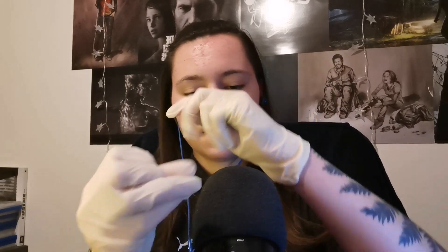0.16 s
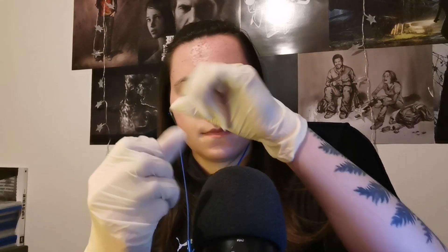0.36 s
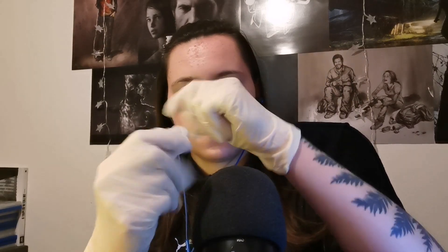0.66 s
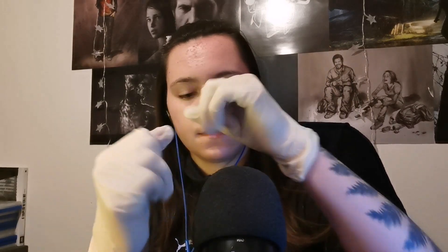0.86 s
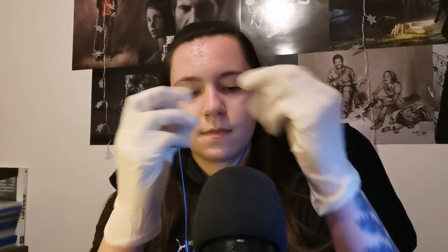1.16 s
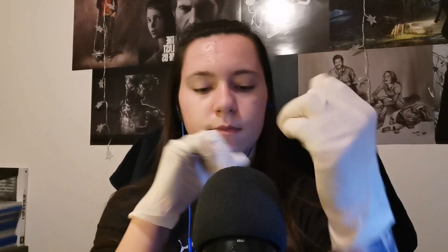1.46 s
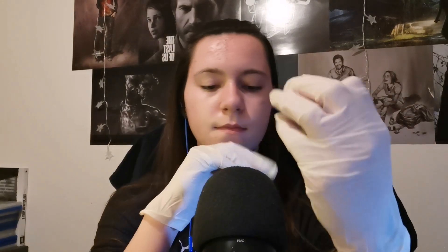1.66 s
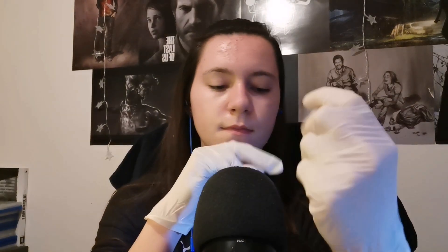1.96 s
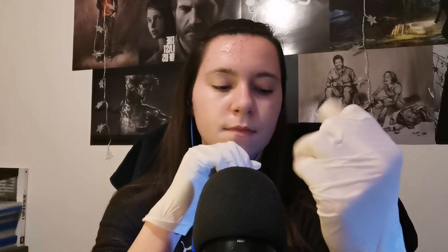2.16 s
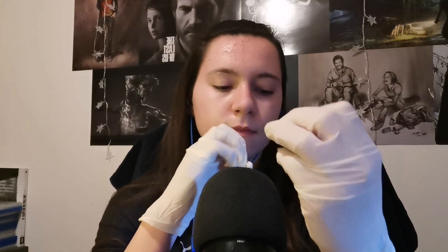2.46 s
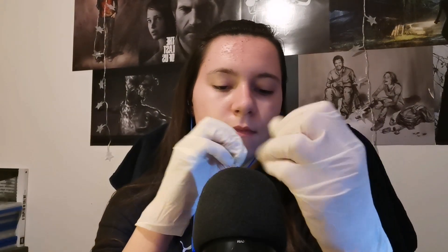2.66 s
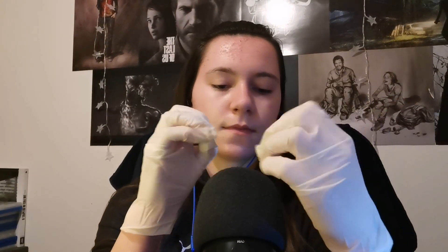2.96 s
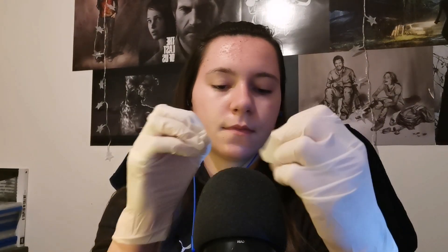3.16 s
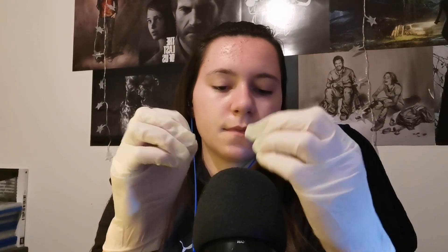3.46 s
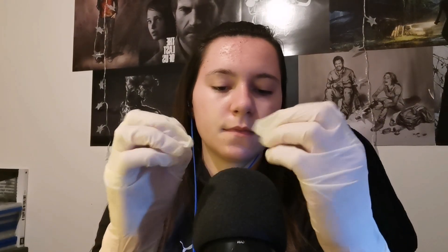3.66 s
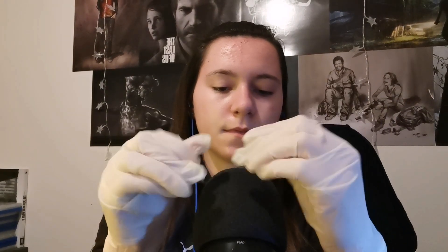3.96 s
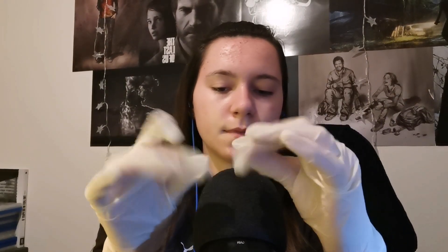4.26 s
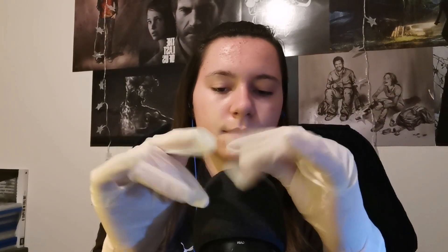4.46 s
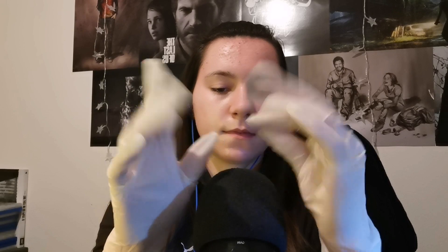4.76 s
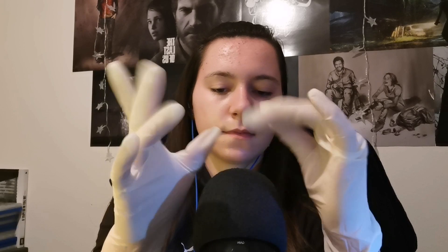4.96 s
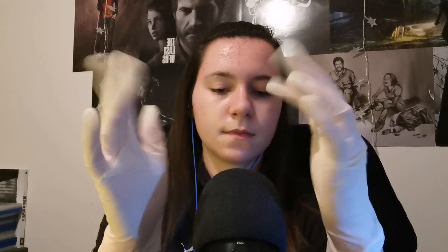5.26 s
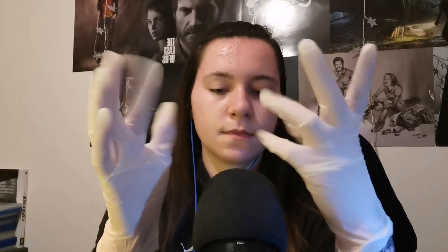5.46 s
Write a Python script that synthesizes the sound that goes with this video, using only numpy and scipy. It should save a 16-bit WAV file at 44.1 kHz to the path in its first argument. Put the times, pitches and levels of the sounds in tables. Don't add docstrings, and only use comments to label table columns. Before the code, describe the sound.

Thin rubber gloves rub, flick and tap very close to a microphone, crackling and snapping over low, lumpy air thumps.

```python
import sys
import numpy as np
from scipy import signal
from scipy.io import wavfile

SR = 44100
rng = np.random.default_rng(int(sys.argv[2]) if len(sys.argv) > 2 else 0)


def materialize(psi):
    bounded = np.clip(np.atleast_2d(psi).T, -1, 1)
    quanta = np.round(bounded * 32767).astype(np.int16)
    wavfile.write(sys.argv[1], SR, quanta)


def magnitude_from_level(level_db):
    exponent = np.asarray(level_db, float) / 20
    return 10 ** exponent


N = 247386


def in_time(rows):
    s, *columns = np.transpose(rows)
    return [np.interp(np.arange(N) / SR, s, c) for c in columns]


def rms_one(x):
    return x / np.sqrt(np.mean(x ** 2) + 1e-20)


def drift(rate):
    pole = np.exp(-80 * np.pi * rate / SR)
    noise = rng.standard_normal(N // 40 + 2002)
    slow = signal.lfilter([1], [1, -2 * pole, pole * pole], noise)[2000:]
    return np.interp(np.arange(N) / 40, np.arange(len(slow)), rms_one(slow))


def band(x, low_hz, high_hz):
    return signal.sosfilt(signal.butter(2, [low_hz, high_hz], "band", fs=SR, output="sos"), x)


def below(x, cut_hz):
    return signal.sosfilt(signal.butter(2, min(cut_hz, .45 * SR), fs=SR, output="sos"), x)


def grains(per_s, spread_db, smooth):
    born = rng.random((4, N)) < per_s * magnitude_from_level(6 * drift(25)) / SR
    sizes = magnitude_from_level(spread_db * np.minimum(rng.exponential(1, (4, N)), 3.2))
    sizes = sizes * rng.choice([-1, 1], (4, N))
    return rms_one(born * sizes) + smooth * rng.standard_normal((4, N))


def coloured(streams, spectrum, patchy_db, patch_rate, slope_db=0):
    hz, level_db = np.transpose(spectrum)
    edges = hz[0] * 2 ** np.arange(0, np.log2(hz[-1] / hz[0]) + .01, 1 / 3)
    parts = []
    for k, (low, high) in enumerate(zip(edges, edges[1:])):
        centre = np.sqrt(low * high)
        gain_db = np.interp(np.log(centre), np.log(hz), level_db) + patchy_db * drift(patch_rate)
        octaves = min(np.log2(centre / 3000), 1)
        parts.append((magnitude_from_level(gain_db) * band(streams[k % 2::2], low, high), octaves))
    scale = np.sqrt(np.mean(sum(part for part, _ in parts) ** 2))
    return sum(part * magnitude_from_level(slope_db * octaves) for part, octaves in parts) / scale


def placed(pair):
    # start_s, side_over_front_db, lean_left (-1..1)
    hands = [(0.1, 1, 0.17), (0.5, 0, -0.048), (0.9, 1, -0.13), (1.3, -1, -0.26), (1.7, -2.5, 0.011),
             (2.1, -1, 0.24), (2.5, -2.5, -0.12), (2.9, 1, -0.19), (3.3, 0.5, -0.33), (3.7, 1.5, 0.29),
             (4.1, 3, 0.25), (4.5, 1, 0.49), (4.9, 1, 0.46), (5.3, -0.5, 0.67)]
    side_db, lean = in_time(hands)
    lean = np.clip(lean, -.95, .95)
    side = lean * pair[0] + np.sqrt(1 - lean ** 2) * pair[1]
    return np.array([pair[0], magnitude_from_level(side_db) * side])


def add(out, x, s):
    start = round(s * SR)
    x = x[:, max(-start, 0):N - start]
    out[:, max(start, 0):max(start, 0) + x.shape[1]] += x


def popped(rows, decay_s, rise_s, gain_db):
    out, t = np.zeros((2, N)), np.arange(round(.06 * SR)) / SR
    envelope = np.minimum(t / rise_s, 1) * np.exp(-t / decay_s)
    bursts = rng.standard_normal((len(rows), len(t)))
    for (s, peak_db, low_hz, high_hz, pan_db), burst in zip(rows, bursts):
        x = below(band(burst * envelope, low_hz, high_hz), 1.34 * high_hz + 500)
        side = np.tanh(pan_db * np.log(10) / 40)
        add(out, magnitude_from_level(peak_db + gain_db) * x / abs(x).max() * [[1], [side]], s)
    return out


def room_noise():
    return magnitude_from_level(-64.5) * rms_one(band(rng.standard_normal((2, N)), 60, 5100))


def fingers():
    # start_s, friction_db, air_flutter_db
    contact = [(0, -44, -41), (.3, -46, -46.5), (.62, -43, -42.5), (.8, -41.5, -39.5), (1.16, -51, -43.5),
               (1.3, -61, -52.5), (1.35, -44.5, -48), (1.9, -44.5, -49.5), (2.35, -46, -46.5),
               (2.5, -45, -41.5), (2.81, -54.5, -46), (3.32, -77, -51), (3.45, -60, -40), (3.74, -82, -50),
               (3.92, -65, -48.5), (3.975, -51, -39.5), (5.05, -44.5, -31.5), (5.3, -76, -78)]
    # start_s, hold_s, friction_db, air_flutter_db
    rubs = [(0, 0.073, -44, -61), (.13, 0.12, -44.5, -43), (.32, 0.1, -39, -43.5), (.81, 0.27, -39.5, -38),
            (1.09, 0.016, -39.5, -38.5), (1.215, 0.04, -44.5, -54), (1.43, 0.25, -42.5, -41.5),
            (1.826, 0.02, -38, -44), (1.99, 0.047, -46, -41.5), (2.13, 0.064, -38.5, -41.5),
            (2.39, 0.029, -41.5, -67), (2.565, 0.031, -36, -46)]
    flicks = [(2.748, 0.017, -42.5, -35.5), (2.87, 0.024, -47.5, -38), (2.938, 0.0058, -48.5, -40),
              (3.026, 0.0069, -53, -32.5), (3.057, 0.016, -41.5, -31.5), (3.18, 0.11, -51.5, -45),
              (3.361, 0.045, -44, -44), (3.476, 0.0034, -43, -33.5), (3.512, 0.043, -46.5, -35),
              (3.618, 0.034, -45.5, -35), (3.803, 0.018, -40.5, -38.5)]
    brushes = [
        (4.085, 0.04, -41, -31.5),
        (4.135, 0.039, -41.5, -30.5),
        (4.216, 0.017, -42.5, -33),
        (4.265, 0.016, -39, -30),
    ]
    taps = [(4.392, 0.024, -44.5, -32.5), (4.478, 0.03, -38.5, -35), (4.63, 0.052, -36, -26.5),
            (4.73, 0.037, -36, -24), (4.888, 0.12, -37.5, -36), (5.092, 0.0035, -37, -45),
            (5.128, 0.0071, -34.5, -32), (5.196, 0.051, -36.5, -33), (5.37, 0.041, -36, -31),
            (5.465, 0.068, -47, -44.5), (5.562, 0.027, -40, -40), (5.585, 0.0098, -43, -36)]
    # strokes, attack_db_per_s, release_db_per_s, bright_db_per_octave
    gestures = [(rubs, 550, 234, 1), (flicks, 790, 430, 2.6),
                (brushes, 600, 490, 3.1), (taps, 760, 340, 0.76)]
    rest_bright_db_per_octave, air_slack = 3, 0.84
    t, (rest_db, calm_db) = np.arange(N) / SR, in_time(contact)
    friction, air = magnitude_from_level(2 * rest_db), magnitude_from_level(2 * calm_db)
    bright = rest_bright_db_per_octave * friction
    for strokes, attack, release, bright_db in gestures:
        for s, hold, friction_db, air_db in strokes:
            before_db = attack * np.maximum(s - t, 0)
            after_db = release * np.maximum(t - s - hold, 0)
            under = magnitude_from_level(-2 * (before_db + after_db))
            stroke = magnitude_from_level(2 * friction_db) * under
            friction = friction + stroke
            bright = bright + bright_db * stroke
            air = air + magnitude_from_level(2 * air_db) * under ** air_slack
    return 10 * np.log10(friction), bright / friction, 10 * np.log10(air)


def stirred_air(flutter_db):
    # start_s, level_db
    swell_levels = [(0, -22), (.22, -32.5), (.69, -35), (.93, -40), (1.1, -30.5), (1.55, -36),
                    (1.91, -34.5), (2.2, -33.5), (2.35, -37.5), (2.8, -30.5), (2.95, -30.5), (3.27, -30.5),
                    (3.63, -26), (3.73, -32.5), (4.16, -26), (4.47, -21.5), (5.61, -27.5)]
    # pitch_hz, level_db (per Hz)
    flutter_spectrum = [(100, 5), (140, -1), (250, -8), (400, -14.5), (1200, -37)]
    swell_db, = in_time(swell_levels)
    swell = rms_one(band(band(rng.standard_normal((2, N)), 26.3, 47.2), 17.4, 52.3))
    swell = swell * magnitude_from_level(2.4 * drift(6.1))
    swing = magnitude_from_level(-5) * rms_one(band(rng.standard_normal((2, N)), 58.3, 91.8))
    gusts = grains(150, spread_db=4, smooth=.6)
    flutter = coloured(gusts, flutter_spectrum, patchy_db=1.5, patch_rate=14)
    flutter = magnitude_from_level(flutter_db - 1 + 2.24 * drift(32)) * flutter
    return placed(magnitude_from_level(swell_db - 2.5) * (swell + swing) + flutter)


def puffs():
    # peak_s, peak_db, length_ms, direction_rad
    rub_puffs = [(.04, -20, 38, -1.1), (.132, -12, 28, 0.36), (.194, -29, 70, -0.9), (.256, -21, 16, 0.6),
                 (.383, -21, 15, 1), (.533, -25.5, 5, 1), (.689, -26, 44, -0.8), (.741, -24.5, 9.3, 0.2),
                 (.807, -20, 47, 0.3), (.852, -22.5, 46, 1), (1.003, -20.5, 52, -0.07),
                 (1.105, -18, 23, -0.3), (1.235, -25.5, 40, 0.2), (1.37, -22.5, 45, 0.4),
                 (1.452, -24.5, 47, 1.3), (1.742, -24, 33, 0.9), (1.815, -30.5, 97, -0.67),
                 (2.062, -27, 57, 1), (2.103, -20, 17.8, -0.8), (2.193, -26, 30, -0.6),
                 (2.413, -26.5, 29, -0.9), (2.481, -30, 46, -0.9), (2.587, -24.5, 36, 0.2),
                 (2.653, -22, 9.8, -1)]
    flick_puffs = [(2.777, -27.5, 39, 1.5), (2.892, -26, 43, -3.5), (2.944, -27.5, 42, 0.5),
                   (3.069, -14.5, 12.6, -0.6), (3.179, -24, 7.7, -1.9), (3.288, -17, 22, 1.5),
                   (3.369, -19.5, 15, 0.7), (3.406, -8.5, 40.7, 2), (3.493, -12.5, 30, 4),
                   (3.635, -6, 22.8, 0.7), (3.824, -17.5, 12, 3.5)]
    tap_puffs = [(3.979, -18, 43, 0), (4.192, -14.5, 21, 0.34), (4.288, -14, 11, -0.3),
                 (4.406, -27, 13.5, 4), (4.482, 1, 13.6, 3), (4.573, -30, 11.6, 4), (4.661, -15, 15, 0.4),
                 (4.737, -15.5, 21.6, 3), (4.799, -25, 59, -0.5), (4.934, -7.5, 17.7, 1),
                 (4.988, -14, 81, 1), (5.051, -14, 14.4, -0.9), (5.097, -12, 7, 5.5), (5.153, -15, 27.4, 3),
                 (5.223, -11.5, 15, 3.1), (5.393, -14, 36.5, -0.9), (5.48, -48, 42, 2),
                 (5.542, -27, 20, -1.7)]
    capsule_hz, quick_puff_hz_ms, spread_hz = 67, 135, 1.3
    blown = rub_puffs + flick_puffs + tap_puffs
    out, phases = np.zeros((2, N)), rng.uniform(0, 2 * np.pi, (len(blown), 3))
    for (s, peak_db, ms, angle), (phase, other, chance) in zip(blown, phases):
        hz = capsule_hz + quick_puff_hz_ms / ms + spread_hz * np.sin(chance)
        rise_s = ms * 0.000374
        t = np.arange(round(7 * rise_s * SR)) / SR
        swell = (t / rise_s * np.exp(1 - t / rise_s)) ** 0.79
        main = np.sin(2 * np.pi * hz * t + phase)
        across = 0.19 * np.sin(2 * np.pi * 1.196 * hz * t + other)
        front = np.cos(angle) * main - np.sin(angle) * across
        side = np.sin(angle) * main + np.cos(angle) * across
        add(out, magnitude_from_level(peak_db + 1) * swell * np.array([front, side]), s - rise_s)
    return out


def shoves():
    # start_s, peak_db, left_over_right_db
    shove_rows = [
        (4.485, -8, 3),
        (5.215, -15.5, -5),
    ]
    rows = [(s, db, 35, 65, pan) for s, db, pan in shove_rows]
    return popped(rows, decay_s=0.01, rise_s=0.006, gain_db=1.5)


def thuds():
    # start_s, peak_db, ring_hz, left_over_right_db
    thud_rows = [(2.88, -23.5, 142, -7), (2.936, -25, 115, -4), (3.056, -24, 107, -8),
                 (3.173, -30.5, 110, -1.0), (3.279, -33, 110, 13), (3.359, -22, 109.7, -13),
                 (3.472, -14.5, 112, 11), (3.622, -15, 110, 5), (3.799, -15, 114, -12),
                 (3.944, -24, 110, -3), (4.087, -23, 109, 9.0), (4.088, -15, 175.7, 19),
                 (4.133, -19.5, 130, 3), (4.213, -18.5, 107, 9), (4.273, -23, 111, 0),
                 (4.397, -16.5, 132, 16), (4.477, -14, 114, 2), (4.575, -22.5, 144, -3),
                 (4.633, -12.5, 110, 17), (4.727, -35.5, 110, 5.5), (4.73, -16.5, 137, -8),
                 (4.811, -16.5, 162, 7.5), (4.887, -13.5, 109, 14), (5.02, -17, 113, 9),
                 (5.204, -19.5, 155, 3), (5.384, -21.5, 116, -17)]
    rows = [(s, db, hz / 1.28, hz * 1.27, pan) for s, db, hz, pan in thud_rows]
    return popped(rows, decay_s=0.019, rise_s=0.0022, gain_db=-3.5)


def knocks():
    # start_s, peak_db
    landings = [(1.827, -30), (3.026, -49), (3.178, -37.5), (3.361, -43), (4.661, -26.5), (4.961, -29.5),
                (5.235, -33), (2.566, -27.5), (2.89, -33), (3.057, -26.5), (3.082, -30.5), (3.511, -30.5),
                (4.394, -29), (4.736, -42), (4.893, -21.5), (5.095, -26), (5.129, -22), (5.374, -28),
                (5.563, -22.5), (5.577, -24)]
    out, t = np.zeros((2, N)), np.arange(round(.04 * SR)) / SR
    bursts = rng.standard_normal((len(landings), 2, len(t)))
    for (s, peak_db), burst in zip(landings, bursts):
        burst[:, 0] = 4.4
        x = band(burst * np.exp(-t / 0.0029), 293, 840)
        add(out, magnitude_from_level(peak_db) * x / abs(x[0]).max() * [[1], [.6]], s)
    return out


def scuffs():
    # start_s, peak_db, ring_hz, left_over_right_db
    scuff_rows = [(0.12, -26, 5400, -7), (0.169, -27.5, 5540, -2.5), (1.094, -37, 3580, 0),
                  (1.138, -32, 13800, 10), (1.821, -35, 7300, 1), (1.830, -13.5, 3030, 4),
                  (2.571, -23.5, 2670, 2), (5.127, -20, 3270, 14), (5.128, -23, 7200, 16),
                  (5.216, -21.5, 2230, 6), (5.538, -28.5, 3520, 21), (5.589, -27.5, 6640, -13)]
    rows = [(s, db, hz / 1.175, min(hz * 1.093, 15500), pan) for s, db, hz, pan in scuff_rows]
    return popped(rows, decay_s=0.0028, rise_s=0.0019, gain_db=-3.5)


def cracks():
    # start_s, peak_db, left_over_right_db
    crack_rows = [(0.1186, -29, 0), (0.7642, -32, -1.0), (1.138, -40, 8), (1.1847, -49, -8.5),
                  (1.8228, -40, 0.5), (1.829, -24, 1.0), (2.6369, -33, -4), (2.7477, -29, 7),
                  (2.8734, -37, 0.0), (2.8883, -35, -1), (2.937, -26.5, -7), (3.058, -27, 5.0),
                  (3.0804, -38, 5.0), (3.3596, -35, 4.5), (3.5114, -36, 0.0), (3.617, -30, 15),
                  (3.8048, -34, -2.5), (3.8172, -27, 1.5), (4.6339, -44, 5.0), (4.9789, -39, 5.5),
                  (5.1272, -40, 8.0), (5.3717, -32, -3)]
    rows = [(s, db, 8300, 15000, pan) for s, db, pan in crack_rows]
    return popped(rows, decay_s=0.0029, rise_s=0.00056, gain_db=-10)


def ticks():
    # start_s, peak_db, ring_hz, left_over_right_db
    crease_ticks = [(0.0262, -26, 5600, 2), (0.3207, -39, 4180, 12), (0.3373, -25, 2150, -4),
                    (0.3994, -29, 2050, 2), (0.427, -37, 2010, 3), (0.4605, -28.5, 2170, 2),
                    (0.5514, -29, 2020, -6), (0.6714, -29, 2170, -15.5), (0.9086, -24, 1880, 4),
                    (0.935, -23, 2000, 1), (0.95, -25, 2040, -0.5), (0.9634, -26, 2150, -2.0),
                    (1.0196, -23.5, 1750, 0.5), (1.0768, -40, 2260, -8), (0.014, -34, 5500, 0),
                    (1.1393, -15, 1830, 5), (1.25, -39, 2350, 8), (1.413, -28, 3270, 54),
                    (1.4701, -23.5, 2120, 1), (1.5247, -24, 1990, 21), (1.555, -25.5, 2910, 8),
                    (1.6302, -25, 2020, 0), (1.7254, -29, 2380, 11), (1.7744, -28, 2500, 2.5),
                    (2.136, -25, 3620, 15), (2.169, -26, 2480, 8), (2.1856, -18, 2630, 6),
                    (2.4715, -31, 1870, -1.0), (2.549, -28, 1900, 12),
                    (2.7477, -31, 5600, 1.0), (2.7734, -29, 5390, -3.5), (2.8419, -41, 5200, -5.0),
                 (2.9746, -38, 1580, -5.0), (3.0674, -30, 1750, 4.0), (3.1762, -41, 1590, -7.0),
                 (3.26, -37, 1840, 2.0), (3.276, -39, 1470, -6.0), (3.3194, -43, 1730, -4.5),
                 (3.3954, -37, 2100, -0.5), (4.0701, -36, 2100, -0.5), (4.1021, -30, 1550, 1.0),
                 (4.1744, -28, 3150, 4.5), (4.2183, -33, 5270, 3.5), (4.4824, -31, 1320, 4.5),
                 (4.6594, -28, 2090, 1.0), (4.7504, -30, 2180, 5.0), (4.7714, -32, 3290, 1.5),
                 (4.8344, -36, 1540, 3.0), (4.9596, -27, 2090, 7.0), (4.9754, -24, 3210, 9.0),
                 (5.0115, -27, 2170, 7.0), (5.0544, -31, 2110, 6.0), (5.0928, -25, 3280, 11.5),
                 (5.2314, -26, 3470, 8.0), (5.2654, -26, 3350, 8.5), (5.3742, -18, 2070, -2.0),
                 (5.4314, -29, 5970, 4.5), (5.4819, -27, 2690, 14.0), (5.5914, -28, 5490, -1.0)]
    width = 1.17
    rows = [(s, db, hz / width, hz * width, pan) for s, db, hz, pan in crease_ticks]
    return popped(rows, decay_s=0.0012, rise_s=0.000088, gain_db=-5.5)


def snaps(flutter_db):
    # start_s, peak_db, ring_hz, length_ms, direction_rad
    rub_snaps = [(.0555, -20, 2290, 0.39, -0.26), (.1052, -14, 1700, 0.28, -0.81),
                 (.12, -16.5, 2210, 1, -0.31), (.175, -22.5, 1800, 0.79, -0.86),
                 (.628, -20, 2900, 1.7, -1.43), (.647, -22, 3230, .9, -1.4),
                 (.735, -13.5, 3920, 1.3, -1.14), (.765, -16, 4660, 1.4, -1.48),
                 (1.0925, -17, 4800, 1.7, -1.03), (1.1097, -20.5, 2360, 0.82, -0.19),
                 (1.139, -19.5, 3800, 3.1, 0.18), (1.1857, -16.5, 6850, 0.59, -1.08),
                 (1.22, -24, 1970, 0.34, -1.27), (1.445, -21.5, 2710, 1.2, 0.73),
                 (1.659, -23, 4070, 1, 0.82), (1.829, -11, 3050, 1, 0.68), (2.208, -20.5, 2650, 0.8, -0.29),
                 (2.418, -21, 4850, 0.91, 0.9), (2.566, -19, 1280, 0.91, -0.56),
                 (2.637, -33, 2200, 2, -0.033), (2.645, -20, 3000, 3.2, 0.94)]
    flick_snaps = [(2.782, -21.5, 5040, 0.82, -0.74), (2.824, -28, 5074, .8, -0.89),
                   (2.888, -18, 4600, 3.1, 0.75), (2.938, -25.5, 4560, 0.49, 0.43),
                   (3.026, -27.5, 1583, 1.8, -0.77), (3.057, -17, 5900, 2.3, 0.52),
                   (3.081, -30.5, 1810, 5.5, 0.98), (3.208, -33, 1660, 2.1, -0.71),
                   (3.217, -31.5, 4670, 0.63, -0.94), (3.361, -13.5, 3300, 1.8, 0.9),
                   (3.342, -45, 5000, 0.36, 0), (3.513, -22, 5100, 1.6, -1.17),
                   (3.545, -39, 3500, .6, 0.0094), (3.619, -20, 5100, 1.2, 0.88),
                   (3.643, -36, 3040, 2.6, 0.065), (3.806, -27, 5700, 1, -0.22),
                   (3.818, -19.5, 4850, 4.4, -1.2)]
    tap_snaps = [(4.149, -35, 2027, 1.56, -2), (4.267, -26.5, 3090, 1.4, 4), (4.396, -18.5, 4860, 5.2, 5),
                 (4.636, -18, 3400, 1.7, 0.4), (4.692, -25.5, 2520, 2.7, 3), (4.736, -23, 1350, 1.2, -0.06),
                 (4.891, -18.5, 3100, 4, 0), (5.094, -37, 3184, 2.5, 2.5), (5.132, -19, 3120, 1.3, -0.5),
                 (5.141, -18, 3050, 2.8, 3), (5.196, -17, 2920, 1.8, 0), (5.374, -14, 2550, 2.4, 1.5),
                 (5.465, -24.5, 3140, 1.2, 0.1), (5.5636, -17, 2600, 0.6, 0.4),
                 (5.575, -20, 2650, 0.22, -1.5)]
    folds = rub_snaps + flick_snaps + tap_snaps
    out, t = np.zeros((2, N)), np.arange(round(.05 * SR)) / SR
    bursts = rng.standard_normal((len(folds), 2, len(t)))
    for (s, peak_db, ring_hz, ms, angle), burst in zip(folds, bursts):
        knock_db = -5 + 0.83 * (flutter_db[round(s * SR)] - peak_db)
        decay_s = max(ms, .3) * 0.002
        burst = burst * np.minimum(t / 0.0001, 1) * np.exp(-t / decay_s)
        burst[:, 8] += 3 * abs(burst).max()
        ringing = band(burst, ring_hz / 1.24, ring_hz * 1.207)
        wide = band(burst, 1240, 5660)
        top = band(burst, 8300, 10000)
        knock = band(burst, 274, 790)
        body = ringing / abs(ringing).max() + wide / abs(wide).max()
        body = below(body, min(2.7 * ring_hz, 8000))
        top_gain = magnitude_from_level(-34) * (ring_hz / 4500) ** 0.94 * ms ** 0.67
        x = body / abs(body).max() + top_gain * top / abs(top).max()
        x = x + magnitude_from_level(knock_db) * knock / abs(knock).max()
        turn = np.array([[np.cos(angle), -.3 * np.sin(angle)],
                         [np.sin(angle), 0.78 * np.cos(angle)]])
        add(out, magnitude_from_level(peak_db + 1) * turn @ x, s)
    return out


def cupped(slips, centre_hz, width_hz):
    turns = np.exp(2j * np.pi * np.cumsum(centre_hz * magnitude_from_level(0.3 * drift(11))) / SR)
    slow = signal.sosfilt(signal.butter(2, width_hz, fs=SR, output="sos"), slips)
    return rms_one(np.real((slow[:2] + 1j * slow[2:]) * turns))


def crackle(per_s, spread_db, cycles):
    born = rng.random((2, N)) < per_s * magnitude_from_level(5 * drift(30)) / SR
    sizes = magnitude_from_level(spread_db * np.minimum(rng.exponential(1, (2, N)), 3))
    sizes = sizes * rng.choice([-1, 1], (2, N))
    dealt, out = rng.integers(0, 10, N), 0
    for k, hz in enumerate(np.geomspace(1300, 7000, 10)):
        r, w = magnitude_from_level(-60 * hz / (cycles * SR)), 2 * np.pi * hz / SR
        clicks = born * sizes * (dealt == k) + 1e-18
        out = out + signal.lfilter([np.sin(w)], [1, -2 * r * np.cos(w), r * r], clicks)
    return rms_one(out)


def rubbing(friction_db, slope_db):
    # pitch_hz, level_db (per Hz)
    film_spectrum = [(500, -12.5), (800, 0), (1150, -13), (1800, -6), (2600, -8), (3100, -7), (4200, -10.5),
                     (7400, -15), (8300, -27.5), (10000, -27), (14500, -31.5), (16100, -28)]
    # start_s, pitch_hz
    hollow_pitch = [(0, 2039), (.82, 1897), (1.1, 2218), (1.75, 2470), (2.18, 2690), (2.35, 1906),
                    (2.6, 1978), (3.1, 1486), (3.75, 1575), (4.1, 1869), (4.7, 2129), (5.25, 2468),
                    (5.61, 2405)]
    slips = grains(1200, spread_db=3.2, smooth=1.2)
    film = coloured(slips, film_spectrum, patchy_db=3, patch_rate=10, slope_db=slope_db)
    hollow_gain = magnitude_from_level(-6 - slope_db / 2 + 2 * drift(8))
    hollow = hollow_gain * cupped(slips, in_time(hollow_pitch)[0], 210)
    gap = magnitude_from_level(-11.5 + slope_db + 2 * drift(48)) * cupped(slips[::-1], 5350, 290)
    creases = magnitude_from_level(-6) * below(crackle(300, spread_db=4, cycles=9), 7000)
    level = magnitude_from_level(friction_db - 4 + 1.67 * drift(39.6))
    return placed(level * (film + hollow + gap + creases))


def scene():
    friction_db, slope_db, flutter_db = fingers()
    mix = room_noise() + stirred_air(flutter_db) + puffs() + shoves() + thuds()
    mix = mix + knocks() + scuffs() + cracks() + ticks()
    front, side = mix + snaps(flutter_db) + rubbing(friction_db, slope_db)
    return np.array([front + side, front - side])


def band_limit(x):
    return signal.sosfilt(signal.butter(12, 16440, fs=SR, output="sos"), x)


def record(dry):
    rounded = .75 * np.tanh(dry / .75)
    cut = signal.sosfilt(signal.cheby1(8, 1, 15100, fs=SR, output="sos"), rounded)
    return band_limit(cut)


dry = scene()
out = record(dry)
materialize(out)
```